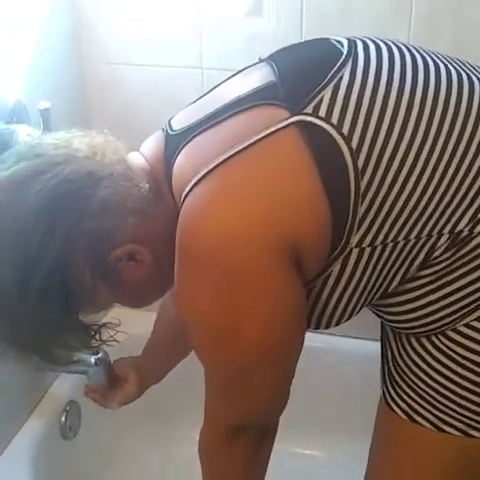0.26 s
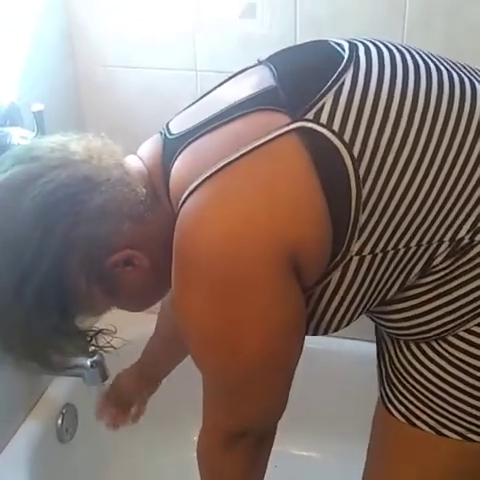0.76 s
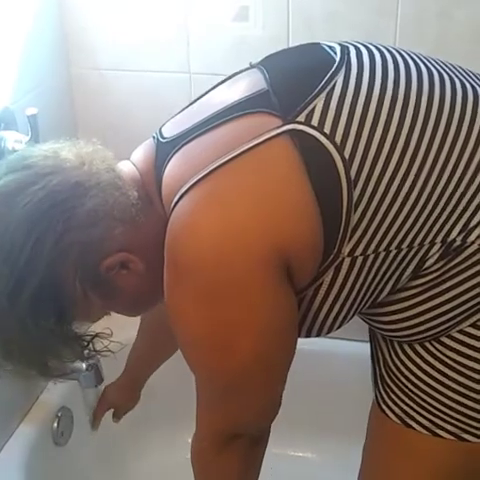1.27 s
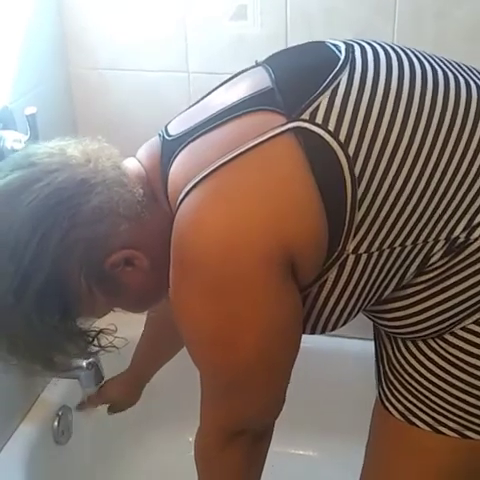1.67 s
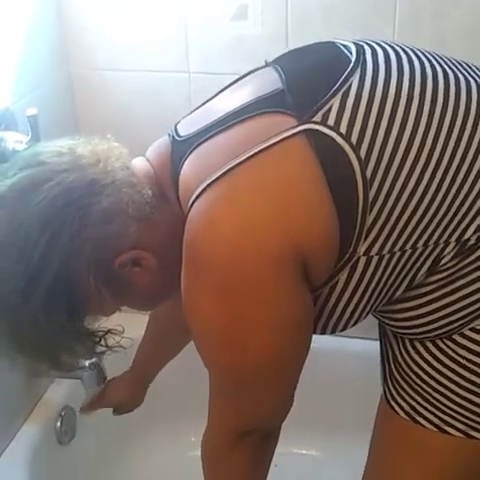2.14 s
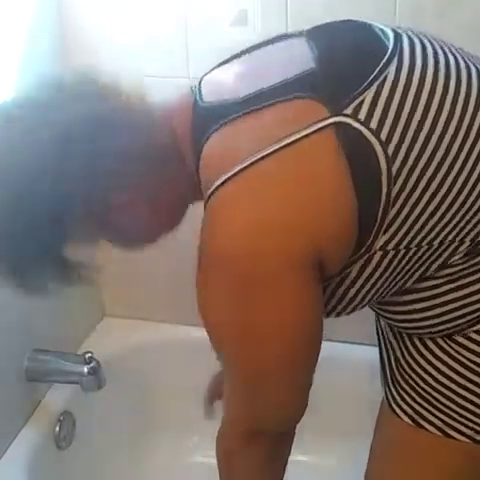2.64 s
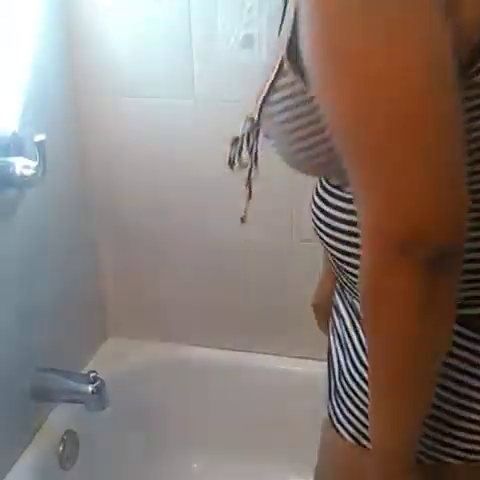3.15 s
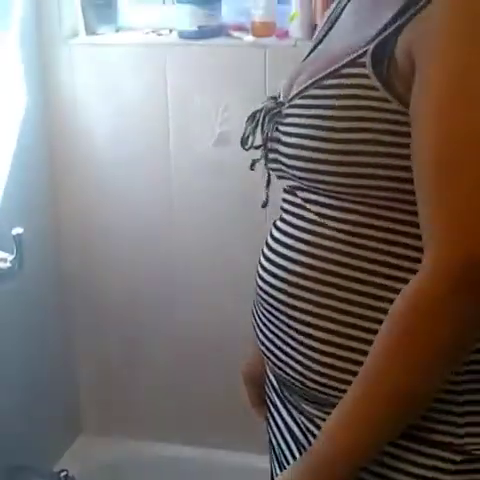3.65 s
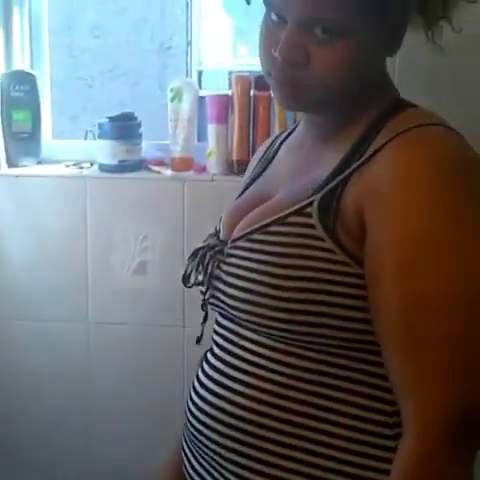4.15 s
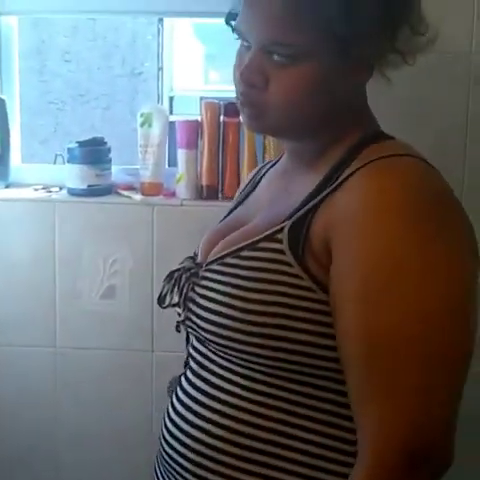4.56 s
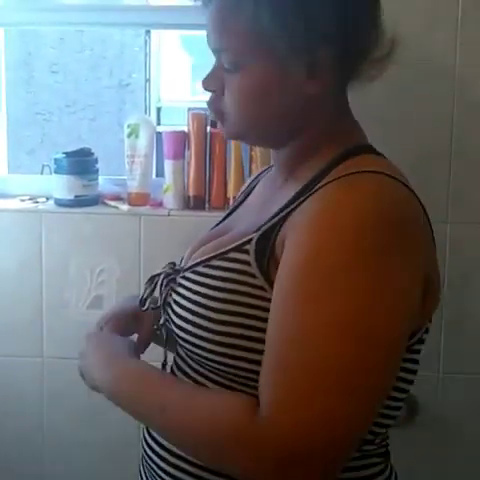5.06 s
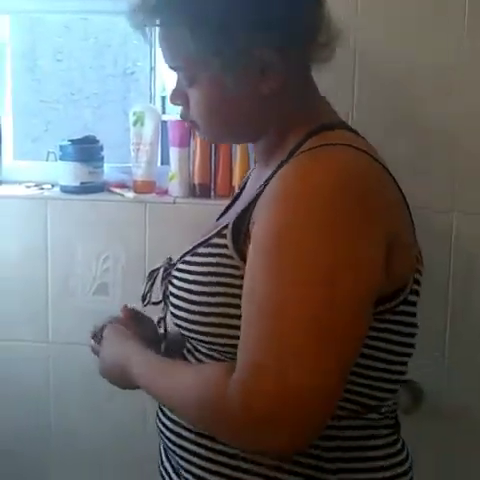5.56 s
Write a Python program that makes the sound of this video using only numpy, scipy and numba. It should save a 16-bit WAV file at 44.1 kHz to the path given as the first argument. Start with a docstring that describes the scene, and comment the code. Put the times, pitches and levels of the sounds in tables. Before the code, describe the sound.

Running tap water fills the whole scene: fine crisp spray over a resonant tub drumming, with small bubbles and gurgles. Early on it flutters in quick surges and low gulps; midway the hiss thins while the drumming continues, broken by short spurts. Then the spray returns abruptly and stays even. Short tile reflections, near phone microphone, widened stereo with phasey colouring.

```python
"""Spray hisses over a drumming tub floor: a bath tap runs into an empty tub in a tiled bathroom.
Drops are colour-filtered random impacts; bubbles are decaying sines of rising pitch. A hand in the water
makes it spurt, then hushes the spray for a second; when the hand leaves, the full splash returns.
A phone with stereo widening listens from beside the tub."""
import sys
import numpy as np
from scipy import signal
from scipy.fft import rfft, irfft, next_fast_len
from scipy.io import wavfile
from scipy.ndimage import uniform_filter1d, map_coordinates
from numba import njit

SR = 44100
rng = np.random.default_rng(int(sys.argv[2]) if len(sys.argv) > 2 else 0)


def unload_audio(sound):
    """Save the sound as a 16-bit wav file, at the path given as the first command line argument."""
    columns = np.transpose(np.atleast_2d(sound))
    # keep every value between -1 and 1, then stretch to whole-number steps
    steps = np.round(np.clip(columns, -1, 1) * 32767)
    wavfile.write(sys.argv[1], SR, steps.astype(np.int16))


N = 256220
TIME = np.arange(N) / SR  # s
SIZE = next_fast_len(N + SR, real=True)  # FFT length, padded for tails
FREQS = np.arange(SIZE // 2 + 1) * SR / SIZE  # Hz


def undb(db):
    """Decibels to amplitude gain."""
    return 10 ** (np.asarray(db) / 20)


def unit(x):
    """Scale to an rms of 1."""
    return x / np.sqrt(np.mean(x ** 2) + 1e-18)


def curve(table):
    """Second column against time, joined by straight lines."""
    s, level = np.transpose(table)
    return np.interp(TIME, s, level)


def spectra(table):
    """Each column after the first, joined by straight lines over log frequency."""
    hz, *columns = np.transpose(table)
    return [np.interp(np.log(FREQS + 1), np.log(hz), c) for c in columns]


def colour_gain(table):
    """Amplitude response of a colour table."""
    return undb(spectra(table)[0])


def filtered(x, response):
    """Pass a sound through a frequency response."""
    return irfft(rfft(x, SIZE) * response, SIZE)[..., :N]


def walk(rate_hz):
    """Random levels held 1 / rate_hz s, smoothed twice; rms 1."""
    hold = int(SR / rate_hz)
    steps = rng.standard_normal(2048)[np.arange(N) // hold]
    return unit(uniform_filter1d(uniform_filter1d(steps, hold), hold))


def drops(response, rate_hz, spread_db):
    """Drops land at random, many small and a few large; each sounds with the given response."""
    lands = rng.random(N) < rate_hz / SR
    size = undb(spread_db * np.minimum(rng.exponential(size=N), 3))
    sign = np.sign(rng.standard_normal(N))
    return unit(filtered(lands * size * sign, response))


@njit
def ring(start_s, hz, cycles, size, rise):
    """Bubbles: each decays over some cycles, its pitch rising as it nears the surface."""
    out = np.zeros(N)
    for k in range(len(start_s)):
        length, first, phase = int(cycles[k] * SR / hz[k]), int(start_s[k] * SR), 0.
        for i in range(min(length, N - first)):
            age = i / length
            phase += 2 * np.pi * hz[k] * (1 + rise * age) / SR
            out[first + i] += size[k] * np.exp(-5.5 * age) * np.sin(phase)
    return out


def bubble_clouds(table, cycles, count):
    """Each row releases a brief cloud of count bubbles scattered around one pitch."""
    s, hz, db, length_s, scatter = np.transpose(table)[:, :, None]
    when, pitch, size = rng.random((len(table), 3, count)).transpose(1, 0, 2)
    start_s = np.maximum(s, 0) + length_s * when
    hz = hz * np.exp(scatter * (2 * pitch - 1))
    # a cloud's bubbles share its energy; one that rings longer starts softer
    share = np.sqrt(20 * length_s * hz / (cycles * count))
    size = undb(db) * (.5 + size) * share
    return ring(start_s.ravel(), hz.ravel(), np.full(start_s.size, 1. * cycles), size.ravel(), 0.219)


def fizz(low_hz, high_hz, cycles, count, scatter=0.047):
    """Many small bubble clouds at random times and pitches."""
    when, pitch, size, length = rng.random((count, 4)).T
    hz = low_hz * (high_hz / low_hz) ** pitch
    length_s = .004 + .02 * length
    table = np.transpose([when * N / SR, hz, -10 * size, length_s, np.full(count, scatter)])
    return unit(bubble_clouds(table, cycles=cycles, count=14))


def bathroom(x, lag_s, t60_s, wet_db, alike_hz=750):
    """Direct path to each port, lag_s apart, plus a decaying tail off the tiles, most alike in the bass."""
    t = TIME[:SR // 2]
    tail = rng.standard_normal((2, len(t))) * undb(-60 * t / t60_s) * (t > .002)
    mid, side = rfft(tail / np.sqrt(np.sum(tail[0] ** 2)), SIZE)
    alike = .78 / (1 + (FREQS / alike_hz) ** 4)
    ports = np.array([[1], [-1]])
    echo = (mid * np.sqrt(1 + alike) + ports * side * np.sqrt(1 - alike)) / np.sqrt(2)
    direct = np.exp(1j * np.pi * FREQS * lag_s * ports)
    return filtered(x, (direct + undb(wet_db) * echo) / np.sqrt(1 + undb(2 * wet_db)))


# surges of the stream glancing off hand or puddle: t/s (onset), spray lift/dB, rise/s, fade/s
SURGE_TABLE = [(.225, 2.5, 0.048, .1), (.34, 5, 0.034, .045), (.43, 5.5, 0.013, 0.093),
               (.55, 4.5, 0.021, 0.087), (.665, 6.5, 0.022, .06), (.76, 3.5, 0.04, 0.091),
               (.895, 1, 0.016, .06), (1.075, 3.5, .018, .04), (1.345, 6, 0.021, 0.028),
               (1.385, 4, 0.022, 0.057), (1.565, 11, 0.049, 0.089), (1.64, 7, 0.024, 0.075),
               (2.145, 8, 0.016, 0.062), (2.272, 5, 0.014, 0.065), (2.31, 7, .035, 0.07),
               (2.405, 4.5, 0.016, 0.027), (2.51, 6.5, 0.028, .055), (2.92, 3, 0.046, 0.087),
               (3.08, 3.5, 0.019, 0.03), (3.255, 2.5, .04, 0.089), (3.4, 5.5, 0.011, 0.043),
               (3.475, 3, 0.018, 0.1), (4.22, 1, 0.045, .07), (4.59, 1.5, .02, 0.23), (4.93, 3.5, .02, .04),
               (5.5, 3, .05, 0.056)]


def surges():
    """Lift of the spray in dB: each surge climbs to its peak and dies away; overlaps add."""
    return sum(np.interp(TIME, [s, s + rise, s + rise + fade], [0, db, 0])
               for s, db, rise, fade in SURGE_TABLE)


# spray level before surges and layer offsets; the hand hushes it, then leaves: t/s, level/dB
SPLASH_LEVEL = [(0, -26), (.11, -28), (.16, -29.5), (.22, -26), (.42, -30.5), (.64, -29.5), (.86, -26),
                (.97, -21.5), (1.06, -27), (1.2, -26.5), (1.25, -29.5), (1.45, -28.5), (1.53, -37.5),
                (2.1, -40), (2.5, -37), (2.603, -34), (2.618, -22.5), (3.22, -27), (3.55, -25),
                (4.5, -25.5), (5.6, -26), (5.69, -28), (5.81, -26)]
FULL_SPLASH_DB = -26.5
FLUTTER_DB, FLUTTER_RATE_HZ = 0.41, 20
# dB at full splash and mid-scene; dB per dB of splash above full; dB per s
COARSE_DB, COARSE_DB_PER_DB, COARSE_DB_PER_S = -4.5, -1, 0.2
MIST_DB, MIST_DB_PER_DB, MIST_DB_PER_S = -5, -0.15, 0.8
BURBLE_DB, BURBLE_DB_PER_DB = -46.5, -0.3


def spray_levels():
    """Levels in dB: whole spray; coarse part and mist against it; puddle burble."""
    splash_db = curve(SPLASH_LEVEL) + surges()
    force_db = splash_db - FULL_SPLASH_DB
    from_middle_s = TIME - TIME.mean()
    # a weak spray is coarser; coarse part and mist both rise slowly, the mist faster, so the hiss brightens
    coarse_db = COARSE_DB + COARSE_DB_PER_DB * force_db + COARSE_DB_PER_S * from_middle_s
    mist_db = MIST_DB + MIST_DB_PER_DB * force_db + MIST_DB_PER_S * from_middle_s
    # water kept from spraying falls into the puddle instead
    burble_db = BURBLE_DB + BURBLE_DB_PER_DB * force_db
    return splash_db + FLUTTER_DB * walk(FLUTTER_RATE_HZ), coarse_db, mist_db, burble_db


# colour of the fine spray: f/Hz, relative level/dB
SPRAY_COLOUR = [(100, -32), (1500, -20), (2900, -2), (4200, 0.5), (6000, -0.5), (7500, 2), (8600, -2.5),
                (10000, -7), (12000, -9.5), (14300, -17.5)]


def fine_spray():
    """Small drops thrown off the impact hiss and flicker."""
    return drops(colour_gain(SPRAY_COLOUR), rate_hz=1200, spread_db=2.5) * undb(-2.5 + 4.0 * walk(60))


# colour of the finest mist: f/Hz, relative level/dB
MIST_COLOUR = [(4000, -34), (7500, -10.5), (8800, 3), (10000, -2.5), (12000, -4.5), (14300, -10)]


def finest_mist(mist_db):
    """The smallest drops make the brightest hiss."""
    return drops(colour_gain(MIST_COLOUR), rate_hz=990, spread_db=7.5) * undb(mist_db - 1.5 + 3.8 * walk(45))


# colour of the coarse splatter: f/Hz, relative level/dB
SPLATTER_COLOUR = [(60, -22), (250, -16), (800, -11), (1500, -23), (2500, -22), (3500, -25), (5000, 12),
                   (8000, -2), (15000, -28)]


def coarse_splatter(coarse_db):
    """Larger drops patter unevenly."""
    impacts = drops(colour_gain(SPLATTER_COLOUR), rate_hz=750, spread_db=1.0)
    return impacts * undb(coarse_db - 17.0 + 7.5 * walk(21.77))


def froth(coarse_db):
    """Clouds of small bubbles: a tinkle that follows the coarse spray and a higher sizzle."""
    tinkle = fizz(1698, 4739, cycles=108, count=120) * undb(coarse_db - 5.0)
    sizzle = fizz(5214, 9510, cycles=122, count=80) * undb(-7.5)
    return tinkle + sizzle


# ringing of the tub: f/Hz, width/Hz, relative level/dB
TUB_RESONANCES = [(116, 16, -8), (155, 18, -8), (200, 30, -9), (235, 24, 1.5), (272, 28, 2), (365, 24, -1),
                  (402, 22, 2.5), (445, 28, -1.5), (512, 26, -2.5), (559, 22, -2), (680, 50, 0),
                  (798, 36, -3), (955, 30, -3), (1126, 44, 0), (1250, 40, -2.5), (1458, 40, -1),
                  (1530, 34, -3)]


def tub_response(broad_gain, ring_db):
    """A broad response with the tub's modes standing out of it, summed in power."""
    modes = sum(undb(2 * db) / (1 + (2 * (FREQS - hz) / width) ** 2) ** 2
                for hz, width, db in TUB_RESONANCES)
    return np.sqrt(broad_gain ** 2 + undb(2 * ring_db) * modes)


def sloshing(x, drift=.013, rate_hz=5):
    """The puddle sloshes about, so the pitches of a sound wander by a small share."""
    lead = np.cumsum(drift * walk(rate_hz))
    return map_coordinates(x, [np.arange(N) + lead], order=1, mode="mirror")


# broad colour of the solid stream's impacts: f/Hz, relative level/dB
THUD_COLOUR = [(25, -29), (60, -17.5), (120, -2), (220, -0.5), (420, 0), (850, -16.5), (1500, -2.5),
               (2200, -5), (4000, -12), (15000, -55)]
DRUM_DB = -38.5


def drum():
    """The solid stream excites the tub modes, even while the hand hushes the spray."""
    response = tub_response(colour_gain(THUD_COLOUR), ring_db=1.0)
    return sloshing(drops(response, rate_hz=500, spread_db=2.5)) * undb(DRUM_DB + 3.8 * walk(18))


def bubbles(low_hz, high_hz, cycles, count):
    """Air dragged under by the stream: bubbles of all sizes at random times."""
    when, pitch, life, size = rng.random((count, 4)).T
    hz = low_hz * (high_hz / low_hz) ** pitch
    return unit(ring(when * N / SR, hz, cycles * (.5 + life), size ** 2 * np.sqrt(hz), 0.19))


def burble(burble_db):
    """Puddle bubbles ring through the tub modes."""
    crowd = bubbles(488, 1434, cycles=13.2, count=900)
    return unit(filtered(crowd, tub_response(1, ring_db=2))) * undb(burble_db)


# rumble level, fading while the hand breaks the stream: t/s, level/dB
RUMBLE_LEVEL = [(0, -65), (.33, -47.5), (.5, -59), (.72, -48), (.95, -46), (1.3, -64), (2.3, -76),
                (2.7, -62), (3.2, -63), (3.6, -58), (4.8, -53), (5.81, -54.5)]
# colour of the rumble: f/Hz, relative level/dB
RUMBLE_TONE = [(25, -14), (50, -6), (80, 2.5), (115, -2), (160, -13), (400, -50)]


def rumble(uneven_db=3.5):
    """Heavy gulps of water thump the tub floor unevenly."""
    thumps = drops(colour_gain(RUMBLE_TONE), rate_hz=74, spread_db=5.0)
    thumps = thumps * undb(curve(RUMBLE_LEVEL) + uneven_db * walk(9))
    return bathroom(thumps, 0, t60_s=.08, wet_db=0)


GURGLE_DB = -45.5


def gurgle():
    """Many small clouds of low bubbles gurgle at random times through the tub modes."""
    clouds = fizz(236, 1507, cycles=20.7, count=85, scatter=0.045)
    clouds = unit(filtered(clouds, tub_response(1, ring_db=2))) * undb(GURGLE_DB)
    return bathroom(clouds, 0, t60_s=0.11, wet_db=1)


# spurts, each a cloud of like-sized bubbles: t/s, f/Hz, level/dB, length/s, pitch spread/share
SPURT_TABLE = [(.06, 1520, -37, 0.065, 0.16), (.11, 3200, -33, .03, 0.15), (.25, 3460, -30, 0.049, 0.082),
               (.37, 1650, -37, 0.044, 0.16), (.42, 780, -43, 0.031, 0.037), (.548, 3180, -27, .036, 0.079),
               (.81, 1480, -34.5, 0.067, 0.23), (.91, 1460, -34.5, 0.096, 0.37),
               (1.25, 1370, -40.5, 0.084, 0.14), (1.425, 3020, -34, 0.038, 0.24),
               (1.69, 1410, -38.5, 0.071, 0.33), (2.15, 893, -41, 0.14, 0.4),
               (2.282, 7240, -32.5, .012, .03), (2.625, 1740, -34.5, 0.047, 0.46),
               (2.64, 3360, -29.5, 0.052, 0.21), (2.74, 2820, -28.5, 0.052, 0.22),
               (2.97, 1640, -44, 0.04, 0.29), (3.3, 1100, -41, 0.051, 0.045), (4.39, 1870, -36, 0.051, 0.1),
               (4.6, 3050, -35, 0.081, .14), (4.94, 480, -39, .025, .15), (5.06, 3230, -34, 0.097, 0.22),
               (5.08, 1350, -41, .05, .25), (5.58, 3620, -30, .04, .13)]


def spurts():
    """Sheets of water break up, each into a brief cloud of bubbles around one pitch."""
    return bathroom(bubble_clouds(SPURT_TABLE, cycles=24, count=90), 0, t60_s=.15, wet_db=-1)


def scene(spots=12):
    """Water lands on several spots of the tub floor, each with its own flicker, all sharing the surges."""
    splash_db, coarse_db, mist_db, burble_db = spray_levels()
    out = np.zeros((2, N))
    # each spot lies in another direction, hence its own lag between the ports
    for lag_s in np.linspace(-.0003, .0003, spots):
        spray = fine_spray() + finest_mist(mist_db) + coarse_splatter(coarse_db) + froth(coarse_db)
        spot = spray * undb(splash_db) + drum() + burble(burble_db)
        out = out + bathroom(spot, lag_s, t60_s=0.097, wet_db=0.5) / np.sqrt(spots)
    return out + rumble() + gurgle() + spurts()


# hollow bands: f/Hz, width/Hz, depth/dB, flicker of the depth/dB rms, 1 = centre or -1 = sides
HOLLOW_BANDS = [(2270, 420, 38, 0, 1), (2050, 270, 10, 18, 1), (2500, 270, 10, 18, 1),
                (4470, 440, 6, 18, 1), (1120, 260, 12, 0, -1), (3350, 400, 14, 0, -1)]
FLICKER_RATE_HZ = 22


def hollowed(x):
    """Narrow bands of the centre and sides sound hollow; some flicker at random."""
    for hz, width, depth_db, flicker_db, sign in HOLLOW_BANDS:
        window = np.exp(-((FREQS - hz) / (width / 2)) ** 8)
        band = filtered((x + sign * x[::-1]) / 2, window)
        cut_db = np.maximum(depth_db + flicker_db * walk(FLICKER_RATE_HZ), 0)
        x = x + band * (undb(-cut_db) - 1)
    return x


# stereo widening: f/Hz, right taken from left/share, left taken from right/share
WIDENING_SHARES = [(40, 0.7, 0.5), (127, 0.45, 0.82), (293, 0.23, 0.2), (660, 0.49, 0.16),
                   (1080, 0.43, 0.76), (2000, 0.83, 0.64), (2560, 0.53, 0.15), (3350, 0.33, 0.23),
                   (4260, 0.46, 0.72), (4900, 0.3, 0.33), (8300, .03, 0.8), (11700, .01, 0.072)]
# the two ports differ a little: f/Hz, left minus right level/dB
PORT_DIFFERENCE = [(300, .1), (2300, 0), (6000, .4), (8400, 2.3), (10500, .1), (12500, -1.1)]
WIDENING_LAG_SAMPLES, TOP_HZ = 19.6, 14250


def record(dry, low_cut_hz=52):
    """The phone widens by taking a delayed copy of each port from the other, and cuts both ends."""
    shares = np.clip(spectra(WIDENING_SHARES), 0, 1)
    delay = np.exp(-2j * np.pi * FREQS * WIDENING_LAG_SAMPLES / SR)
    balance = undb(spectra(PORT_DIFFERENCE)[0] * np.array([[1], [-1]]) / 2)
    gain = balance / np.sqrt(1 + shares ** 2)
    wide = filtered(dry, gain) - filtered(dry[::-1], gain * shares * delay)
    low_cut = signal.butter(2, low_cut_hz, "high", fs=SR, output="sos")
    high_cut = signal.ellip(12, .1, 80, TOP_HZ, fs=SR, output="sos")
    return signal.sosfilt(high_cut, signal.sosfilt(low_cut, hollowed(wide)))


dry = scene()
out = record(dry)
unload_audio(out)
```